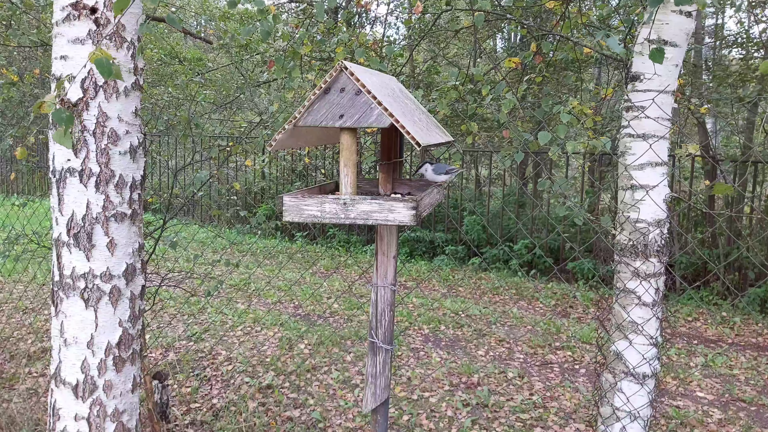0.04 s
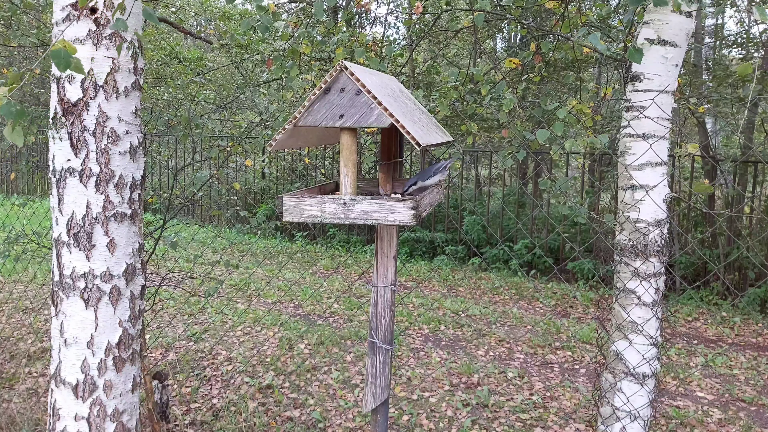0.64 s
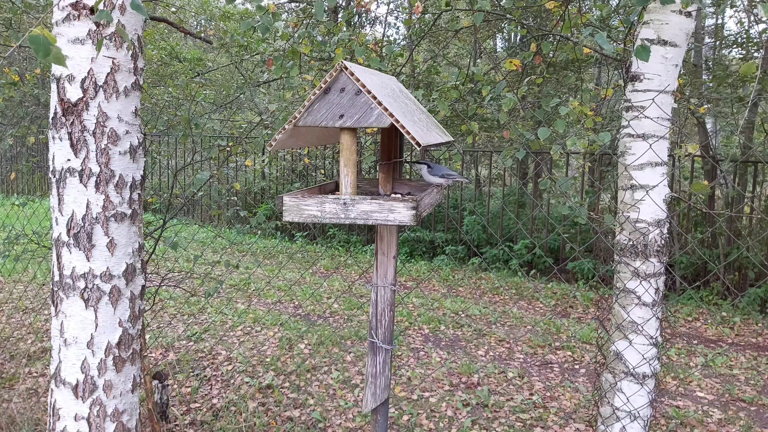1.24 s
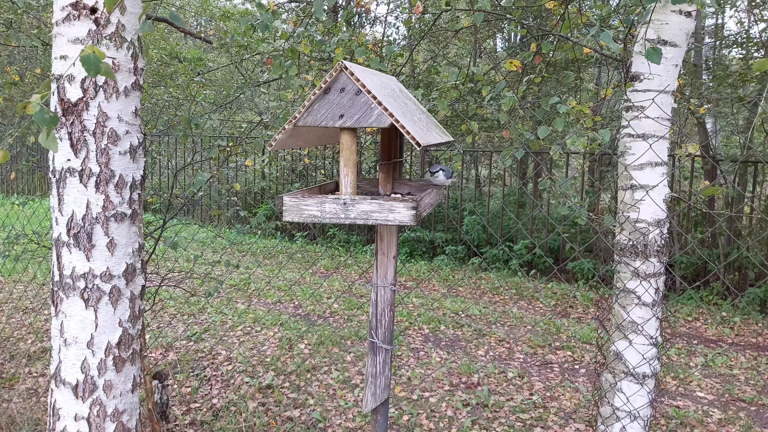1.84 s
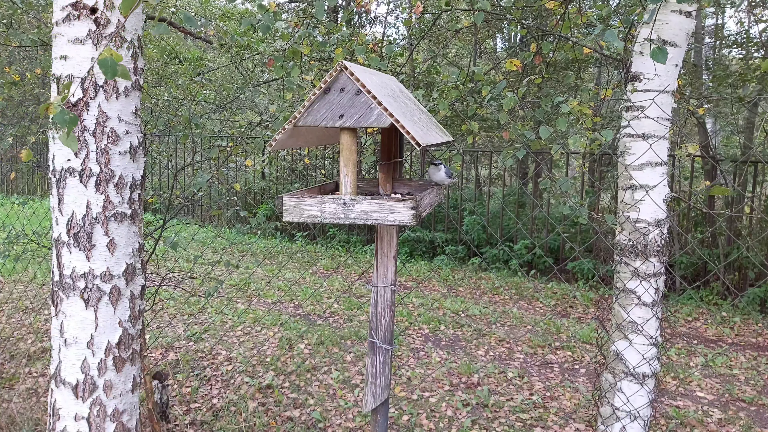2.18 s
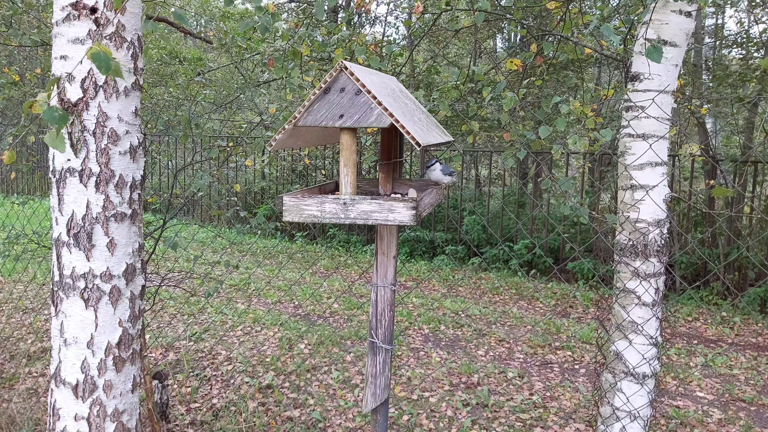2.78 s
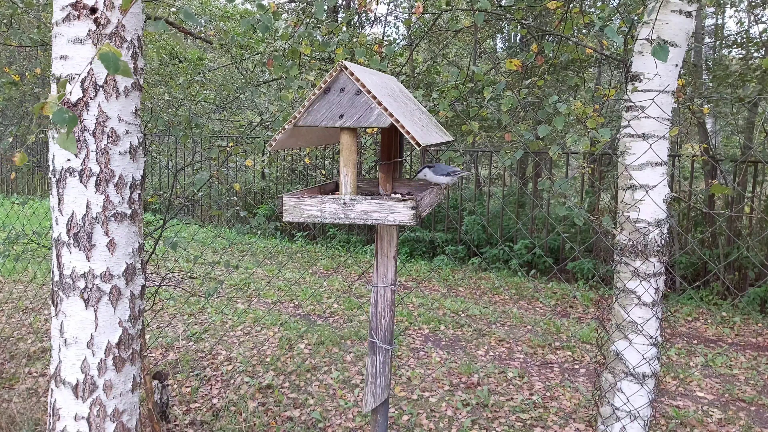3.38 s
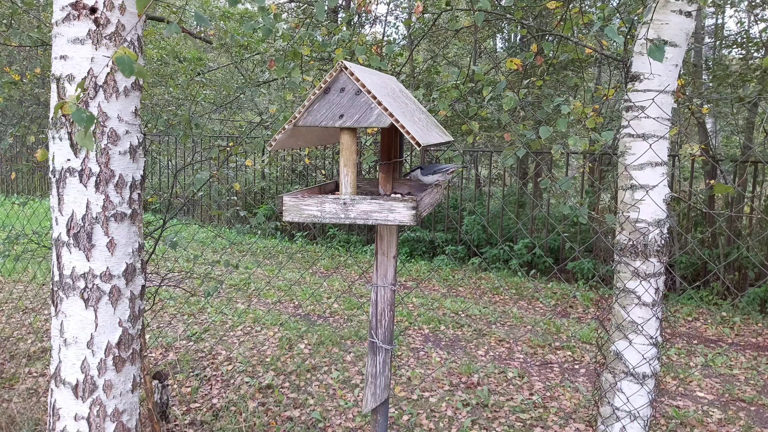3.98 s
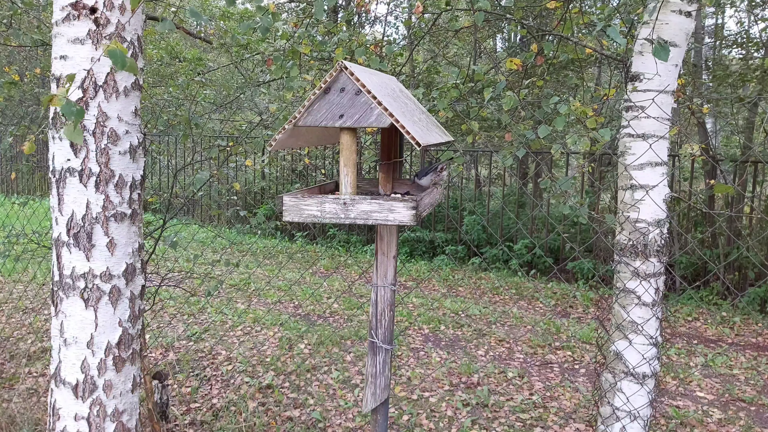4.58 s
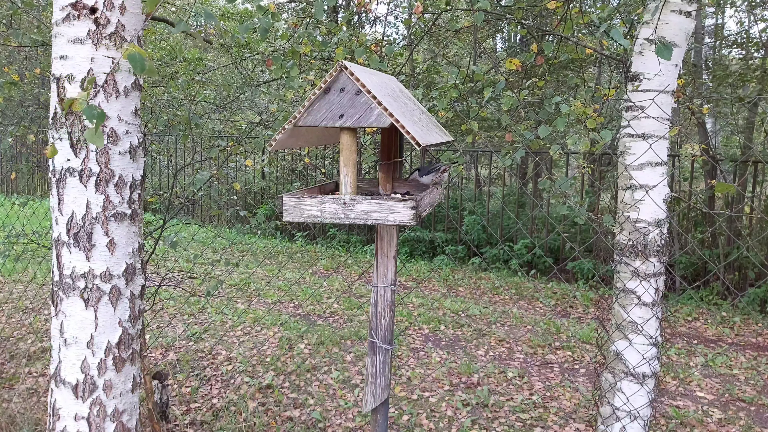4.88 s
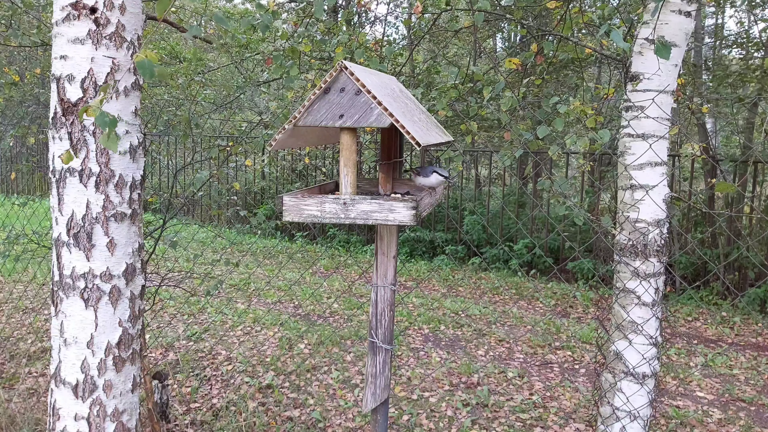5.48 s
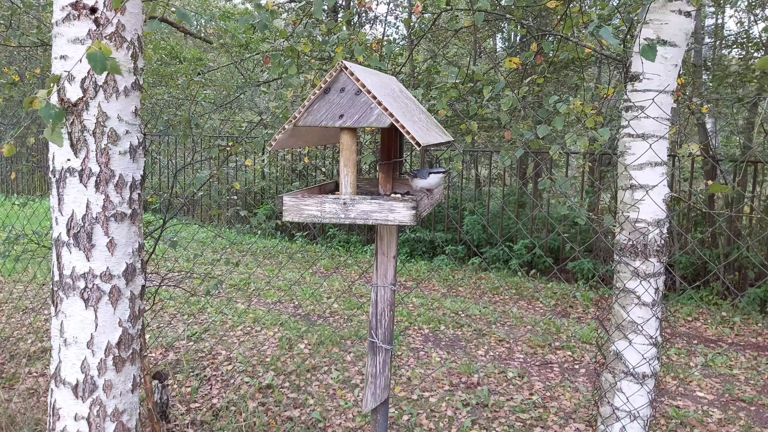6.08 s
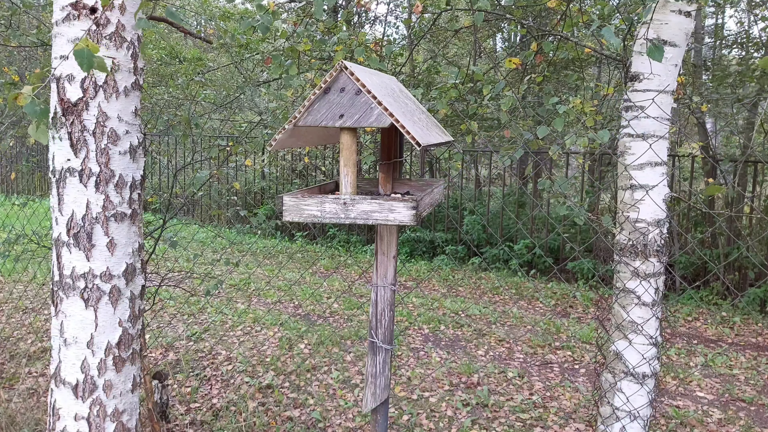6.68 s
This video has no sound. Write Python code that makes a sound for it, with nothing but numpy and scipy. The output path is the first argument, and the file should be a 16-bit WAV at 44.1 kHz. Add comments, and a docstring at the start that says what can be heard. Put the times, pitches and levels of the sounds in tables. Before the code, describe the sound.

A small songbird fires quick runs of sharp high chips and raspy dipping notes outdoors, with thin whistles and a soft wing flutter.

```python
"""Nuthatch and tit at a garden feeder.

A nuthatch fires trills of steep chips and longer dipping notes: a gliding membrane tone that rasps
when slack. A tit adds four thin high whistles. Trunks and leaves scatter every note. A seed clicks
twice; near the end wings puff air as they flutter off the tray. A phone hears it from the left of
the birds, over faint leaf hiss and a low murmur and rumble."""
import sys
import numpy as np
from scipy import signal
from scipy.fft import rfft, irfft
from scipy.io import wavfile
from scipy.ndimage import uniform_filter1d

SR = 44100
rng = np.random.default_rng(int(sys.argv[2]) if len(sys.argv) > 2 else 0)


def wav_out(sig):
    """Save sig, one row per channel (or a flat mono array), as 16-bit PCM at SR to the path in sys.argv[1]."""
    wavfile.write(sys.argv[1], SR, np.round(np.clip(np.atleast_2d(sig).T, -1, 1) * 32767).astype(np.int16))


N = 296793
TIME_S = np.arange(N) / SR

# Trills: (start [s], crest [Hz], arch [dB], first plunge [dB], soft start [dB], pressure [dB],
# fade [dB/ms])
TRILLS = [(0, 8010, -25.5, -28.5, 0, -1, 3.5), (.25, 8250, -28, -28.5, 0.5, -3, 3),
          (.83, 8003, -28.5, -28.5, 0.5, 0.5, 2.8), (1.25, 7964, -24.5, -27.5, 2, 2.5, 2),
          (1.87, 8126, -25, -26.5, 1.5, -1, 2.9), (3.43, 8045, -24.5, -24.5, 8, 0, 2.5),
          (3.63, 8055, -25.5, -25, 1.5, -1.5, 3.5), (4.43, 8040, -27.5, -24, 15, -3, 3),
          (4.67, 8040, -26, -28.5, -0.5, -2.5, 3.4), (5.04, 8143, -32.5, -22.5, 15, -0.5, 2.5),
          (6.28, 7950, -24, -19, 14, -4, 3)]
# Chips: (mid-plunge time [s], accent [dB])
CHIPS = [(.016, -0.5), (.053, 0), (.271, 0.5), (0.2986, 1.5), (.334, 2.5), (.371, 1.5), (0.4144, 0),
         (.851, -1.5), (.885, 0.5), (.923, 1.5), (.9706, .5), (1.0192, -1), (1.2736, -1), (1.311, .5),
         (1.349, 1.5), (1.39, 2), (1.436, 0.5), (1.4813, 0), (1.8907, 0.5), (1.9303, 0), (1.973, 2),
         (2.0122, 0.5), (2.0563, -0.5), (3.458, -1), (3.489, 0), (3.5324, 0), (3.5745, .5), (3.651, -1),
         (3.6847, 0.5), (3.7442, -1), (3.7845, 0), (4.459, -0.5), (4.492, 1), (4.5354, 1), (4.578, -1),
         (4.6299, 0), (4.6903, 0), (4.724, 1.5), (5.0642, -1), (5.0984, 0), (5.1429, 0), (5.1933, -0.5),
         (5.2487, -1), (6.311, -3.5), (6.345, -1.5), (6.39, -1.5)]
CHIP_PLUNGE_MS = 9.65


def trills(warm_up_chips=0.82, flat_hz_per_db=21.5, tiring_db=0.7, lag_ms=0.5):
    """Nuthatch chip runs: a soft start is also flat, and the plunges weaken along the run."""
    out = np.zeros(N)
    ends = [row[0] for row in TRILLS[1:]] + [np.inf]
    for (start, crest_hz, arch_db, plunge_db, soft_db, press_db, fade), end in zip(TRILLS, ends):
        run = [row for row in CHIPS if start <= row[0] < end]
        for k, (s, accent_db) in enumerate(run):
            pace, depth, tune = 1 + np.array([0.06, 0.21, 0.0072]) * rng.standard_normal(3)
            cold_db = soft_db * np.exp(-k / warm_up_chips)
            ms, hz, db = chip(crest_hz * tune - flat_hz_per_db * cold_db, arch_db - cold_db,
                              plunge_db - tiring_db * k, fade * depth)
            times = s + (ms - CHIP_PLUNGE_MS + lag_ms) / 1000 * pace
            add(out, times[0], nuthatch(times, hz, db + accent_db, press_db, slackness=0, hiss_db=-22))
    return out


def chip(crest_hz, arch_db, plunge_db, fade_db_per_ms, hold_ms=7.58):
    """Contour of one chip: swells on the climb, falters at the turn, snaps mid-plunge, fades."""
    ms = np.arange(-12.5, 19, 0.5)
    hz = swoop(ms, crest_hz, 0.21 * crest_hz, CHIP_PLUNGE_MS, climb_hz_per_ms=159.95, steepness=3.545)
    db = arch_db + (plunge_db - arch_db) * ramp(ms, start=2.77, length=5.25)
    db -= 20 * (1 - ramp(ms, start=ms[0], length=5.6))
    db -= 4 * bell(ms - 2, width=1.7)
    db += 4 * bell(ms - CHIP_PLUNGE_MS + 1, width=1.82)
    db -= fade_db_per_ms * np.maximum(ms - hold_ms, 0)
    return ms, hz, db


# Opening slurs: (crest time [s], crest [Hz], low pitch [Hz], level [dB])
OPENERS = [(0.237, 8130, 6180, -31.5), (0.82, 8030, 5740, -33.5), (1.2421, 7900, 6516, -27.5),
           (1.86, 7930, 5754, -28.5)]


def openers():
    """Short rising and sinking slurs that lead into some trills."""
    out = np.zeros(N)
    for s, crest_hz, low_hz, db in OPENERS:
        times = s + np.array([-9.5, -7, 0.5, 3, 7, 13]) / 1000
        hz = [6800, 0.94 * crest_hz, crest_hz, (crest_hz + low_hz) / 2, low_hz, 1.02 * low_hz]
        levels_db = db + np.array([-13, -12.5, -0.5, 0.5, -0.5, -16.5])
        add(out, times[0], nuthatch(times, hz, levels_db, press_db=-0.5, slackness=0, hiss_db=-42.5))
    return out


# Dipping notes: (plunge time [s], flick time [s], crest [Hz], trough [Hz], flick [Hz], arch [dB],
# plunge [dB], flick [dB])
DIPS = [(2.589, 2.629, 8130, 2397, 5422, -33, -25, -27), (2.774, 2.8272, 7480, 2080, 5440, -31.5, -26, -26),
        (2.946, 3.0017, 7870, 2208, 4767, -36.5, -26, -26.5),
        (3.3474, 3.397, 7316, 2103, 5390, -37.5, -26.5, -26),
        (3.982, 4.0401, 7208, 2032, 4890, -37, -30, -29.5),
        (4.113, 4.1642, 7330, 2190, 4520, -50, -26.5, -27),
        (4.331, 4.3936, 7213, 2084, 5240, -53, -29, -28), (4.9433, 4.999, 7250, 1991, 5070, -36, -28, -26),
        (5.433, 5.4902, 7250, 1960, 5154, -29.5, -28, -28),
        (5.5878, 5.648, 7400, 2077, 4444, -32.5, -25.5, -27.5),
        (5.856, 5.9177, 7060, 1980, 4586, -46, -25.5, -26),
        (6.1773, 6.2362, 6962, 2073, 4823, -56.5, -24, -25.5),
        (6.5539, 6.616, 7310, 2077, 4740, -35.5, -24, -26)]


def dipping_notes(onset_hz=6888, climb_hz_per_ms=113.5, plunge_ms=10.8, droop_hz_per_ms=26, tail_ms=16):
    """The nuthatch plunges, goes slack in a rasping trough, then tightens for a clean closing flick."""
    out = np.zeros(N)
    for plunge_s, flick_s, crest_hz, trough_hz, flick_hz, arch_db, plunge_db, flick_db in DIPS:
        crest_s = plunge_s + (1 - plunge_ms) / 1000
        flick_ms = (flick_s - crest_s) * 1000
        climb_hz = crest_hz - onset_hz
        ms = np.arange(-climb_hz / climb_hz_per_ms, flick_ms + tail_ms, 0.5)
        late_ms = ms - flick_ms
        hz = swoop(ms, crest_hz, trough_hz, plunge_ms, climb_hz_per_ms, steepness=4.1)
        hz += (flick_hz - trough_hz) / (1 + (late_ms / 4.2) ** 2)
        hz -= droop_hz_per_ms * np.maximum(late_ms, 0)
        db = dip_level(ms, late_ms, plunge_ms, arch_db, plunge_db, flick_db)
        press_db = dip_pressure(ms, late_ms, climb_hz)
        slackness = ramp(ms, start=8.5, length=24.3) * (1 - ramp(late_ms, start=-14, length=9.53))
        times = crest_s + ms / 1000
        add(out, times[0], nuthatch(times, hz, db, press_db, slackness, hiss_db=-12.5))
    return out


def dip_level(ms, late_ms, plunge_ms, arch_db, plunge_db, flick_db, drop_db=20, fade_db_per_ms=2.5):
    """Level through arch, plunge, trough and flick; ms counts from the crest, late_ms from the flick."""
    db = arch_db + (plunge_db - arch_db) * ramp(ms, start=2.2, length=7.9)
    db -= drop_db * ramp(ms, start=8.13, length=8.06)
    db += (flick_db - plunge_db + drop_db) * ramp(late_ms, start=-20, length=15)
    db -= 18 * (1 - ramp(ms, start=ms[0], length=7))  # attack
    db += 3 * bell(ms - plunge_ms + 1, width=2.2)  # mid-plunge snap
    db -= 8 * bell(late_ms, width=3.55)  # falter atop the flick
    return db - fade_db_per_ms * np.maximum(late_ms - 5, 0)


def dip_pressure(ms, late_ms, climb_hz, arch_db=-11.5, trough_db=4.5, flick_db=-17, db_per_hz=0.0092):
    """Pressure peaks in the trough and eases for the flick; a higher crest takes more."""
    db = arch_db + db_per_hz * climb_hz
    db += (trough_db - arch_db) * ramp(ms, start=11.27, length=3)
    return db + (flick_db - trough_db) * ramp(late_ms, start=-27, length=13.7)


def swoop(ms, crest_hz, bottom_hz, plunge_ms, climb_hz_per_ms, steepness):
    """Pitch climbs to a crest at 0 ms, is halfway down at plunge_ms, then levels out."""
    height = 1 / (1 + (np.maximum(ms, 0) / plunge_ms) ** steepness)
    return bottom_hz + (crest_hz - bottom_hz) * height + climb_hz_per_ms * np.minimum(ms, 0)


# Second partial: (fundamental [Hz], relative level [dB])
OCTAVE = [(2100, -9), (2600, -1), (3800, -17.5), (5200, -22), (6500, -16.5), (7400, -11.5), (7900, -25)]
# Throat turbulence, tight voice: (frequency [Hz], density [dB])
TIGHT_HISS = [(1600, -22.5), (2500, -6), (3500, 4), (7000, 4), (9500, 3.5), (13000, 5), (16000, -14.5)]
# Throat turbulence, slack voice: (frequency [Hz], density [dB])
SLACK_RASP = [(1400, -33), (2000, -5.5), (2700, 2), (4200, -1), (5500, -24), (8000, -26.5), (14000, -23.5)]
TOP_HZ = 16300


def nuthatch(times, pitches_hz, levels_db, press_db, slackness, hiss_db):
    """Near sine. Pressure adds overtones and, up high, half partials and hiss; slackness adds rasp."""
    hz, phase, envelope = syrinx(times, pitches_hz, levels_db, waver=0.0069, flutter_db=2)
    n = len(hz)
    t = times[0] + TIME_S[:n]
    pressure = undb(np.interp(t, times, np.full(len(times), press_db)))
    slack = np.interp(t, times, np.full(len(times), slackness))
    half_phase = phase / 2 + walk(n, 923)
    halves = undb(-25) * np.sin(phase + half_phase) + undb(-30) * np.sin(half_phase)
    partials = undb(at(OCTAVE, hz)) * np.sin(2 * phase)
    partials += undb(-30) * (hz < TOP_HZ / 3) * np.sin(3 * phase)
    partials += ramp(hz, start=5000, length=2000) * halves
    # The slack membrane beats unevenly, in groups of three cycles.
    growl_depth = 0.16 * slack * np.clip(1 + 0.5 * walk(n, 128), 0, 2)
    growl = growl_depth * np.sin(phase / 3 + 1.25 * walk(n, 299.5))
    hiss = undb(hiss_db) * pressure * ramp(hz, start=2600, length=2500) * noise(TIGHT_HISS, n)
    rasp = undb(-2) * slack * noise(SLACK_RASP, n)
    return envelope * (np.sin(phase) * (1 + growl) + pressure * partials + hiss + rasp)


def syrinx(times, pitches_hz, levels_db, waver, flutter_db, edge_s=0.00026):
    """Pitch, phase and envelope of a membrane gliding unsteadily through the given points."""
    t = np.arange(times[0], times[-1], 1 / SR)
    hz = uniform_filter1d(np.interp(t, times, pitches_hz), size=100, mode="nearest")
    hz *= 1 + waver * walk(len(t), 693)
    db = np.interp(t, times, levels_db) + flutter_db * walk(len(t), 405)
    edges = ramp(np.minimum(t - t[0], t[-1] - t), 0, edge_s)
    return hz, 2 * np.pi * np.cumsum(hz) / SR, np.sqrt(2) * undb(db) * edges


# Whistles: (first crest [s], last crest [s], first crest [Hz], sag [Hz], last crest [Hz],
# first level [dB], last level [dB])
WHISTLES = [(2.336, 2.389, 8650, 8282, 9089, -29, -26), (6.009, 6.065, 8950, 8440, 9348, -32, -21),
            (6.377, 6.416, 9530, 8950, 9700, -22.5, -21), (6.546, 6.591, 9817, 8600, 9330, -26.5, -31.5)]


def tit(scoop_s=0.01206, scoop_hz_per_s=215000, sag_s=0.0154, drop_s=0.0142, drop_hz_per_s=54700):
    """Thin whistles that scoop up, sag, climb and drop; the second partial carries the pitch."""
    out = np.zeros(N)
    for start_s, end_s, start_hz, sag_hz, end_hz, start_db, end_db in WHISTLES:
        times = np.arange(start_s - scoop_s, end_s + drop_s, 0.001)
        early_s, late_s = np.maximum(start_s - times, 0), np.maximum(times - end_s, 0)
        sagged = ramp(times, start_s, sag_s)
        climbed = ramp(times, start_s + sag_s, end_s - start_s - sag_s)
        hz = sag_hz + (start_hz - sag_hz) * (1 - sagged) ** 2 + (end_hz - sag_hz) * climbed ** 1.73
        hz -= scoop_hz_per_s * early_s + drop_hz_per_s * late_s
        db = np.interp(times, [start_s, end_s], [start_db, end_db]) - 3 * sagged * (1 - climbed)
        db -= 15 * early_s / scoop_s + 17 * late_s / drop_s
        _, phase, envelope = syrinx(times, hz, db, waver=0.0022, flutter_db=1)
        tone = np.sin(phase) + undb(-29) * np.sin(phase / 2) + undb(-24) * np.sin(1.5 * phase)
        add(out, times[0], envelope * tone)
    return out


# Downstrokes: (time [s], level [dB])
WINGBEATS = [(6.373, -43), (6.428, -44), (6.48, -44), (6.541, -48), (6.601, -49), (6.655, -54.5)]
# Air pushed by a wing: (frequency [Hz], density [dB])
WING_AIR = [(20, -6), (45, 0.5), (90, 0), (220, -7.5), (500, -13.5), (1300, -21.5), (4000, -28.5),
            (15000, -26)]


def wings(rise_s=0.00725, fade_s=0.0269):
    """Each downstroke sends a soft puff of air, louder on the right."""
    strokes = sum(undb(db) * np.exp(-np.maximum((s - TIME_S) / rise_s, (TIME_S - s) / fade_s))
                  for s, db in WINGBEATS)
    right = noise(WING_AIR)
    left = undb(-12) * (0.5 * right + 0.6 * noise(WING_AIR))
    return strokes * np.array([left, right])


# Seed clicks: (time [s], level [dB])
SEED_CLICKS = [(1.772, -45), (1.826, -50)]


def seed_clicks(fade_s=0.00045):
    """Dry clicks of a seed against the beak."""
    out, t = np.zeros(N), TIME_S[:400]
    for s, db in SEED_CLICKS:
        add(out, s, undb(db) * rng.standard_normal(len(t)) * np.exp(-t / fade_s))
    return out


# Reflection off trunks and leaves: (frequency [Hz], gain [dB])
SCATTER = [(1800, 2.5), (3000, -3), (4500, -0.5), (7000, 0.5), (10000, 6.5), (15000, 7.5)]


def woods(x, near_db, far_db, near_t60_s=0.1, far_t60_s=0.597, gap_s=0.0021):
    """Echo spectrum for one side: grainy scatter off feeder, ground and trunks, then a tree tail."""
    t = TIME_S[:SR]
    near = rng.standard_normal(SR) * np.exp(0.45 * walk(SR, 911.8))
    near *= undb(-60 * t / near_t60_s) * (t > gap_s)
    far = rng.standard_normal(SR) * undb(-60 * t / far_t60_s) * ramp(t, start=0, length=0.022)
    echoes = undb(near_db) * near / np.linalg.norm(near) + undb(far_db) * far / np.linalg.norm(far)
    return rfft(signal.fftconvolve(x, echoes)[:N]) * undb(at(SCATTER, bins()))


# Left microphone port against the right: (frequency [Hz], gain [dB])
LEFT_SHADE = [(1500, -11), (3000, -13.5), (4100, -12.5), (5400, -13.5), (7200, -5), (8000, -17),
              (8700, -19), (9600, -19.5), (10800, -23), (16000, -23)]


def from_right(x, near_db, far_db, left_lag_s=0.000473, left_scatter_db=5.5):
    """Source off to the right: the left port hears it late, shaded and with more scatter."""
    delayed = rfft(x) * np.exp(-2j * np.pi * bins() * left_lag_s)
    left = delayed + undb(left_scatter_db) * woods(x, near_db, far_db)
    left *= undb(at(LEFT_SHADE, bins()))
    right = rfft(x) + woods(x, near_db, far_db)
    return irfft(np.array([left, right]), N)


# Outdoor air: (frequency [Hz], density [dB])
AIR_SPECTRUM = [(15, -45), (25, -12.5), (97, -2.5), (157, -11.5), (344, -8.5), (405, -10.5), (677, -14.5),
                (936, -16), (1370, -17.5), (1480, -17.5), (1890, -19.5), (2910, -16), (3430, -20.5),
                (4030, -10), (16000, -22.5)]
# Air common to both sides: (frequency [Hz], power share [0-1])
AIR_COHERENCE = [(60, 0.793), (130, 0.47), (290, 0.39), (640, 0.44), (1400, 0.071), (3000, 0.028)]
# Air, left against right: (frequency [Hz], gain [dB])
AIR_BALANCE = [(60, -5.5), (200, -7), (400, -9), (4400, -7.5), (8000, -10), (15000, -12.5)]
# Low background swells, mostly during the calls: (time [s], half width [s], murmur lift [dB],
# rumble lift [dB])
LOW_SWELLS = [(0.27, 0.072, -0.5, 0), (1.046, 0.043, 5.5, 0), (1.46, 0.115, 5.5, 8.5),
              (2.022, 0.055, 3.5, 7), (2.64, .04, 3.5, 1), (3.64, 0.0463, 9.5, -8), (4.58, 0.26, 1.5, -0.5),
              (4.953, .1, -1, 5), (5.12, 0.09, 8, 5), (5.651, 0.069, 5, 4.5)]


def air(rumble_hz=150, murmur_hz=1500, growth_db_per_s=0.44):
    """Steady leaf hiss over a slowly growing murmur and a rumble, with brief low swells."""
    shared, own = rfft(noise(AIR_SPECTRUM)), rfft([noise(AIR_SPECTRUM), noise(AIR_SPECTRUM)])
    coherence, balance_db = at(AIR_COHERENCE, bins()), at(AIR_BALANCE, bins())
    spectra = np.sqrt(coherence) * shared + np.sqrt(1 - coherence) * own
    spectra *= undb(np.array([balance_db, -balance_db]) / 2)
    murmur_db = 3 + growth_db_per_s * TIME_S + 1.5 * walk(N, 8)
    rumble_db = 6 + 1.5 * walk(N, 9)
    for s, width_s, murmur_lift_db, rumble_lift_db in LOW_SWELLS:
        swell = bell(TIME_S - s, width_s)
        murmur_db += murmur_lift_db * swell
        rumble_db += rumble_lift_db * swell
    rumble = undb(rumble_db) * irfft(spectra * low_band(rumble_hz), N)
    murmur = undb(murmur_db) * irfft(spectra * (low_band(murmur_hz) - low_band(rumble_hz)), N)
    hiss = irfft(spectra * (1 - low_band(murmur_hz)), N)
    return rumble + murmur + hiss


def undb(db):
    """Decibels to gain."""
    return 10 ** (np.asarray(db) / 20)


def at(points, hz):
    """Read (Hz, value) points on a log-frequency axis."""
    freqs, values = np.transpose(points)
    return np.interp(np.log(np.maximum(hz, 1)), np.log(freqs), values)


def bins():
    """Frequencies of a full-length spectrum."""
    return np.arange(N // 2 + 1) * SR / N


def low_band(corner_hz):
    """Low-pass gain per bin."""
    return 1 / (1 + (bins() / corner_hz) ** 4)


def noise(points, size=N):
    """Unit-rms noise with the given spectrum."""
    gain = undb(at(points, np.fft.rfftfreq(size, 1 / SR)))
    x = irfft(rfft(rng.standard_normal(size)) * gain, size)
    return x / np.std(x)


def walk(size, rate_hz):
    """Smooth random drift, spread near 1."""
    steps = np.arange(size) * rate_hz / SR
    knots = int(steps[-1]) + 2
    return 1.38 * np.interp(steps, np.arange(knots), rng.standard_normal(knots))


def bell(x, width):
    """Bump of height 1 around zero."""
    return np.exp(-(x / width) ** 2)


def ramp(x, start, length):
    """Linear rise from 0 to 1."""
    return np.clip((x - start) / length, 0, 1)


def add(out, s, x):
    """Mix x in at time s."""
    start = int(round(s * SR))
    skip = max(-start, 0)
    part = x[skip:len(out) - start]
    out[start + skip:start + skip + len(part)] += part


def suppressor(x, shut_db=-60, range_db=32, depth_db=4, window_s=0.059, below_hz=1500):
    """Turns the low band down whenever the whole sound falls quiet."""
    power = uniform_filter1d(np.mean(x ** 2, axis=0), size=int(window_s * SR))
    opened = ramp(10 * np.log10(np.maximum(power, 1e-12)), shut_db, range_db)
    low = irfft(rfft(x) * low_band(below_hz), N)
    return x + low * (undb(-depth_db * (1 - opened)) - 1)


def scene():
    """Both birds, seed, wings and air, in stereo."""
    chips = from_right(undb(-1.2772) * (trills() + openers()), near_db=-4, far_db=-22)
    dips = from_right(dipping_notes(), near_db=-7, far_db=-19)
    whistles = from_right(undb(-2.5) * tit(), near_db=-17, far_db=-34)
    clicks = from_right(seed_clicks(), near_db=-21, far_db=-20)
    return chips + dips + whistles + clicks + wings() + undb(-67) * air()


def record(dry):
    """The phone hushes the lows between calls, thins the deepest bass and cuts the top."""
    bass_cut = signal.butter(2, 44, "highpass", fs=SR, output="sos")
    top_cut = signal.ellip(10, 0.2, 70, TOP_HZ, fs=SR, output="sos")
    return signal.sosfilt(top_cut, signal.sosfilt(bass_cut, suppressor(dry)))


dry = scene()
out = record(dry)
wav_out(out)
```